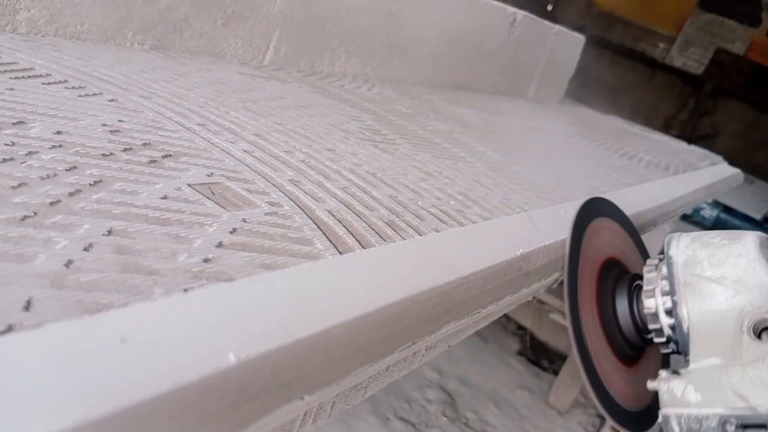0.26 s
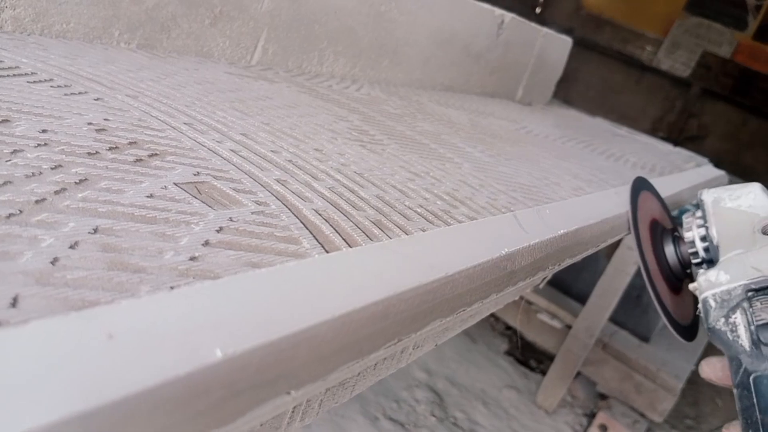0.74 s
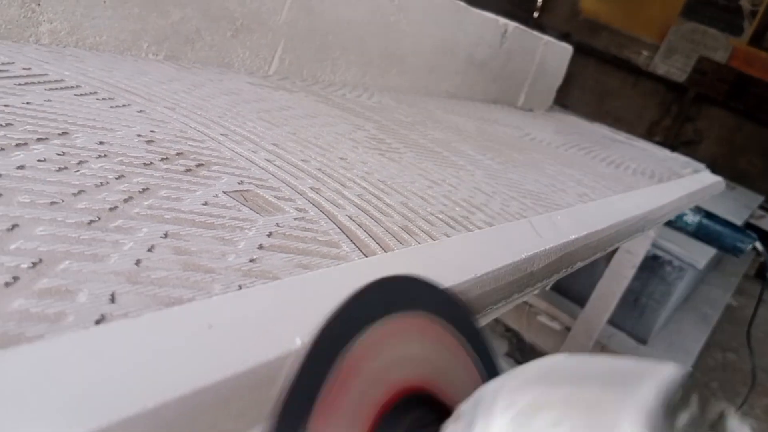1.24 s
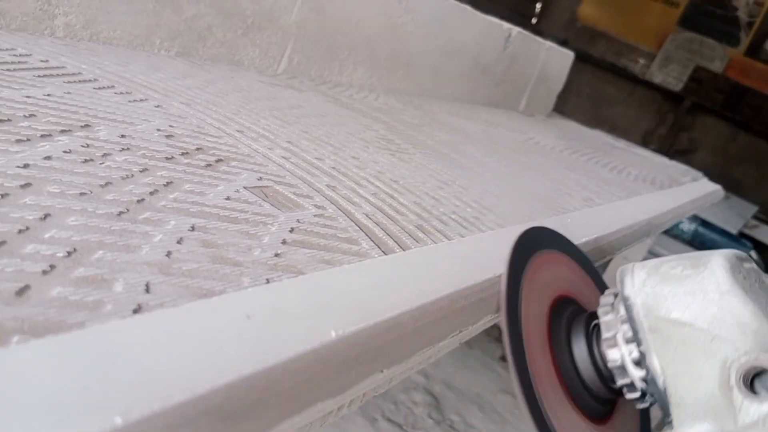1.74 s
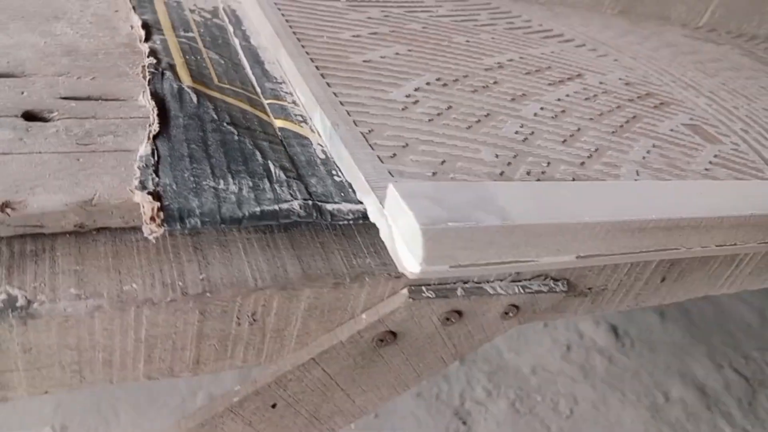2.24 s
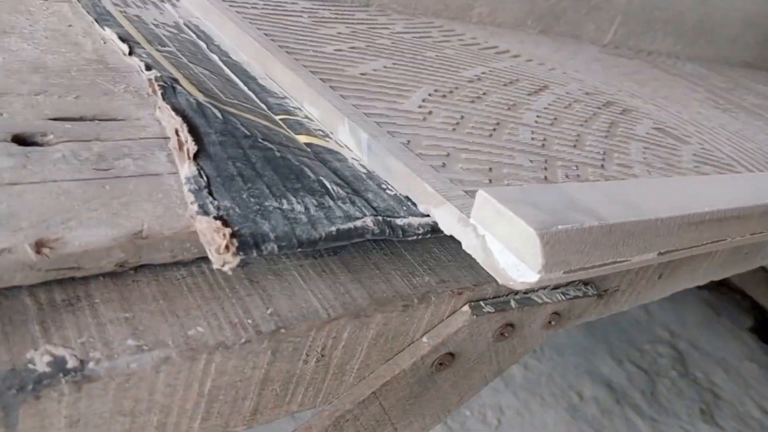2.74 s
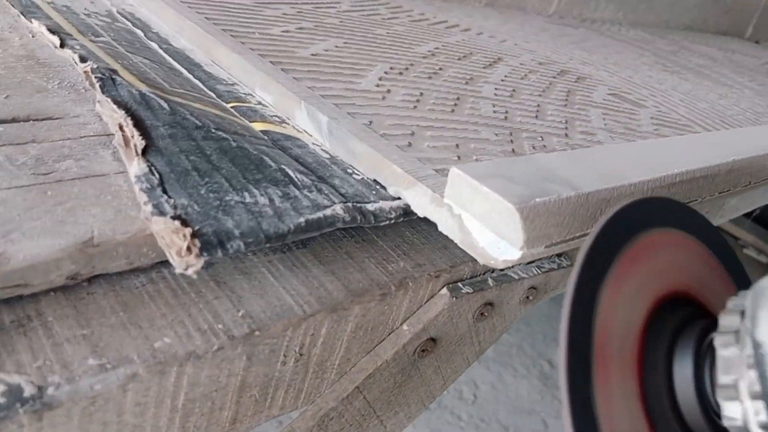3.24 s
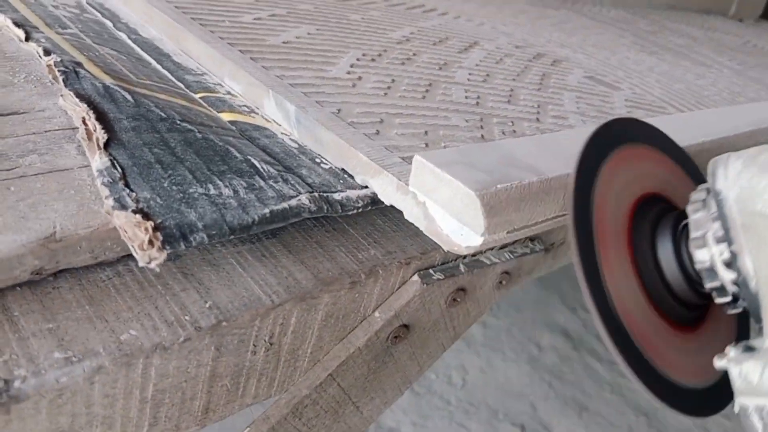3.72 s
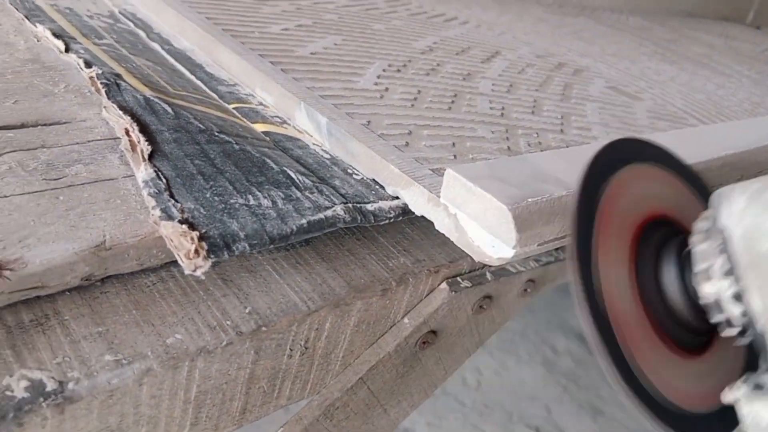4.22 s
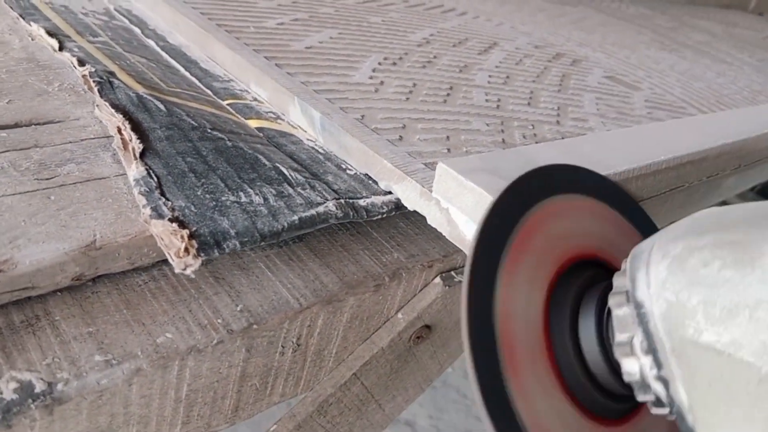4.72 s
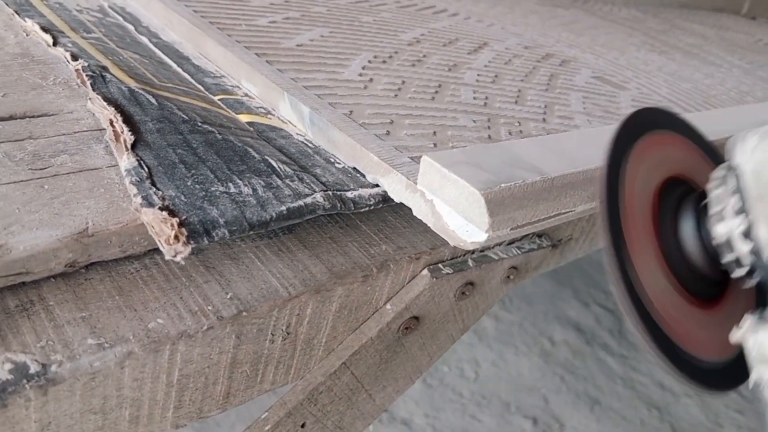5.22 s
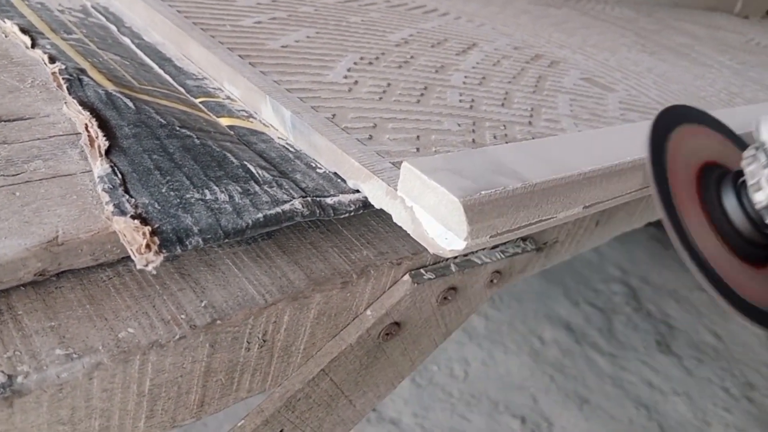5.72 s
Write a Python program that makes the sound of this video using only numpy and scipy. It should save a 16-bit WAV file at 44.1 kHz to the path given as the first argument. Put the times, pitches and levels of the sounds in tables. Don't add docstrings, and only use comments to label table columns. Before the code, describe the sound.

An angle grinder rasps loudly against stone close by, whining and sagging under load, then cuts abruptly to a quieter, duller, more distant pass.

```python
import sys
import numpy as np
from scipy import signal
from scipy.fft import rfft, irfft
from scipy.io import wavfile
from scipy.ndimage import uniform_filter1d, map_coordinates

SR = 44100
rng = np.random.default_rng(int(sys.argv[2]) if len(sys.argv) > 2 else 0)


def file_out(sig):
    cols = np.atleast_2d(sig).T
    lim = np.clip(cols, -1, 1)
    pcm = np.round(lim * 32767).astype(np.int16)
    wavfile.write(sys.argv[1], SR, pcm)


def magnitude_from_level(level_db):
    exponent = np.asarray(level_db, float) / 20
    return 10 ** exponent


N = 262836

GEAR = 3.555
SONG = 26
STEPS = 1024

# (close view ends [s], far view starts [s])
CUT = (2.1318, 2.1378)
CLOSE_END, FAR_START = CUT
# (time [s], disc speed [turns/s], pressure on the stone [dB])
DISC = [
    [(0.0, 132.5, 8), (0.42, 122.8, 10), (0.56, 121.5, 10.5), (0.8, 127.5, 5), (1.25, 131.4, 5),
     (1.47, 134.3, 7), (2.14, 123.5, 7.5)],
    [(2.14, 151.9, 3), (3.3, 152.9, -18), (3.6, 152.4, 5.5), (3.97, 148.6, 3), (4.1, 148.4, 6),
     (4.38, 142.6, 10), (4.66, 144.4, 5), (5.0, 141.7, 7.5), (5.31, 140.8, 2), (5.44, 143.1, 6.5),
     (5.83, 137.1, 8)],
]
REGION_EDGES = [700, 2600, 4500, 5800, 9300, 15500]
# (frequency [Hz], level per Hz [dB])
COLOUR = [
    [(60, -74), (150, -54), (300, -11), (550, -13.5), (900, -4), (2300, -6.5), (2900, -1.5), (3500, 4),
     (4300, -2.5), (5600, -5.5), (7200, 6.5), (8600, 5.5), (11000, 0), (15500, -2.5)],
    [(60, -48), (150, -84), (260, -12), (450, -11), (900, -0.5), (1400, -1), (2500, -2.5), (3800, -2),
     (4400, -6.5), (5600, -11.5), (7700, -4.5), (8800, -5.5), (11000, -21), (15500, -23.5)],
]
# (frequency [Hz], width [Hz], depth [dB])
HOLLOWS = [
    (4842, 197, -20),
    (9330, 110, -9),
    (11680, 410, -3),
    (13780, 450, -8),
]
# (multiple of disc speed [1], level over the grit [dB])
RIDGES = [(1, -20), (9, -18.5), (15, -12.5), (22, -12.5), (30, -6.5), (45, -4), (75, -7.5), (120, -1)]
# (multiple of motor speed [1], side step [disc turns], level over the grit [dB])
WHINE = [(2, -1, -6), (2, 0, -8), (3, 0, -9), (4, 0, -10), (5, 0, -8), (6, 0, -4), (7, 0, -7), (8, 0, -6),
         (10, 0, -5), (11, 0, -4), (12, 0, -8), (1, 1, -11), (2, 1, -11), (1, -1, -9)]
# (frequency [Hz], level per Hz [dB])
WIND_COLOUR = [(25, -40), (60, -15), (125, -0.5), (250, -10.5), (500, -25.5), (1200, -30.5), (3000, -59)]
# (time [s], peak [dB])
POPS = [(0.151, -26), (0.255, -9), (0.323, -31), (0.971, -10), (1.023, -3), (1.047, 6), (1.051, 3.5),
        (1.065, -3), (1.083, 13), (1.096, 0), (1.105, 1), (1.121, -10), (1.156, -3.5), (1.662, -7.5),
        (1.784, -9), (1.81, -7), (1.895, -4), (1.972, -4.5), (2.039, -14), (2.059, -18), (2.131, 4.5),
        (2.546, -19), (4.273, -18), (4.314, -8.5), (5.163, -14), (5.196, -13), (5.617, -12), (5.684, -10),
        (5.752, -5), (5.83, -6)]
# (start [s], end [s], multiple of disc speed [1], level [dB])
TONES = [(0.0, 0.39, 4, -38), (0.0, 0.39, 5, -36), (0.09, 0.42, 19, -33), (0.55, 0.9, 16, -33),
         (2.3, 3.6, 6.11, -46), (0.5, 0.76, 28, -29), (0.5, 0.68, 2.555, -39), (5.32, 5.5, 10, -43),
         (0.54, 0.78, 29, -30), (0.92, 1.3, 55, -29), (1.4, 1.72, 11, -33), (1.15, 1.5, 2.555, -40),
         (5.23, 5.31, 25, -39), (1.16, 1.88, 17, -33), (1.34, 1.73, 4, -39), (1.42, 1.81, 28.44, -32),
         (1.52, 2.1, 57, -30), (1.63, 2.09, 86, -32), (1.71, 2.12, 76, -35), (1.75, 2.12, 60, -29),
         (1.83, 2.12, 16, -33), (3.56, 5.5, 1, -54.5), (3.65, 4.03, 6.11, -43), (3.92, 4.45, 10, -41),
         (4.33, 4.47, 13, -42), (4.58, 4.85, 10, -43), (4.88, 5.16, 13, -40), (5.54, 5.89, 71, -45),
         (5.51, 5.91, 57, -42), (5.53, 5.86, 55, -42)]
# (time [s], level [dB])
REACH = [
    [(0.0, -18.5), (0.2, -19), (0.4, -19), (0.75, -20.5), (0.9, -17.5), (1.3, -20), (1.65, -19.5),
     (2.12, -21.5)],
    [(2.15, -31), (3.0, -29), (3.5, -29.5), (4.23, -27.5), (4.35, -33), (4.75, -33.5), (5.38, -32.5),
     (5.7, -32.5), (5.96, -39.5)],
]
# (start [s], peak [s], end [s], swing [dB])
SWINGS = [(-0.3, 0.363, 0.53, 4), (0.45, 0.62, 0.84, 7), (0.736, 0.865, 1.23, 7), (0.92, 1.186, 1.3, 5.5),
          (1.557, 1.843, 2.95, 7), (3.403, 3.755, 4.18, 4), (4.12, 4.318, 5, 6), (4.714, 4.94, 5.16, 8.5),
          (4.984, 5.217, 5.28, 9), (5.404, 5.646, 6.03, 9.5)]
# (ring [dB], grit [dB], fizz [dB])
AWAY = [(-4.5, -4, -6), (-6, -3.5, -6.5)]
SWING_SHARE = (-0.28, 0.24, 0.94, 1.18)
# (start [s], end [s], level [dB], lift of upper ridges [dB])
STROKES = [(0.0, 0.208, -17, -16), (0.216, 0.53, -21, -4), (1.125, 1.423, -26.5, -8),
           (1.43, 1.72, -21.5, -4.5), (1.732, 1.87, -23.5, 8), (1.9, 2.143, -25.5, 8),
           (3.9, 4.24, -44, -8.5), (4.27, 4.52, -49, 6), (4.552, 4.82, -42, -6), (5.16, 5.3, -45.5, 2.5),
           (5.309, 5.7, -44.5, .3)]
NEIGHBOURS = (22, 24, 25, SONG, 27, 28, 30, 31, 32, 33)
NEIGHBOUR_DB = (-11, -14, -14, -.3, -8, -13, -14, -13, -14, -16)
# (start [s], end [s], level [dB])
HUM = [(0.13, 1.1, -39), (1.25, 1.48, -39.5), (1.72, 2.12, -38), (2.38, 3.02, -47), (3.03, 3.7, -41.5),
       (3.88, 4.15, -42), (4.5, 4.85, -52), (5.26, 5.46, -47), (5.65, 5.85, -53)]
# (start [s], end [s], level [dB])
OVERTONE = [(0.3, 0.81, -35), (1.05, 1.48, -34), (4.12, 4.3, -43), (4.33, 4.95, -45), (4.96, 5.3, -48),
            (5.33, 5.69, -40.5)]
# (start [s], length [s], level [dB])
GUSTS = [(0.93, 0.15, -31.5), (1.05, .026, -20), (1.088, 0.023, -13), (1.146, 0.019, -22.5),
         (1.781, 0.067, -21), (1.888, 0.017, -29.5), (1.957, .02, -27), (2.553, 0.014, -38),
         (2.77, 0.014, -50), (4.272, 0.077, -33.5), (4.385, .015, -43.5), (4.944, .14, -42.5),
         (5.163, .015, -35), (5.184, 0.032, -31), (5.563, 0.074, -39.5), (5.664, 0.16, -26.5)]
# (time [s], lowest frequency [Hz])
SIDE_PATCHES = [(0.051, 13700), (0.375, 4130), (0.654, 5640), (1.537, 5600), (1.581, 7490), (2.282, 4180),
                (2.282, 10980), (2.63, 8910), (2.63, 9800), (2.63, 13000), (3.187, 6200), (3.187, 11670),
                (3.698, 5120), (3.86, 12360), (4.255, 13050), (4.672, 13050), (4.859, 12360)]


def evened(x):
    return x / np.sqrt(np.mean(abs(x) ** 2) + 1e-20)


def read(points, hz):
    f, value = np.transpose(points)
    return np.interp(np.log(hz + 1), np.log(f + 1), value)


def curves(views, t):
    close, far = (np.transpose(rows) for rows in views)
    return [np.where(t < CLOSE_END, np.interp(t, close[0], a), np.interp(t, far[0], b))
            for a, b in zip(close[1:], far[1:])]


def drift(shape, along, across=1):
    x = uniform_filter1d(rng.standard_normal(shape), max(round(across), 1), -1)
    for _ in range(2):
        x = uniform_filter1d(x, round(along), 0)
    return evened(x)


def wind_level(t):
    far = t > CLOSE_END
    stage = far.astype(int) + (far & (curves(DISC, t)[1] > 0))
    draught_db = np.array((-36.5, -67.5, -57))[stage] + np.array((2, 8, 3.5))[stage] * drift(N, 2500)
    gust_db = np.full(N, -120.)
    for start, length, db in GUSTS:
        sag = 9 * ((t - start) / length).clip(0, 1)
        rise = 1000 * (start - t).clip(0)
        fall = 320 * (t - start - length).clip(0)
        gust_db = np.maximum(gust_db, db - sag - rise - fall)
    return draught_db, gust_db


def wind():
    t = np.arange(N) / SR
    hz = np.fft.rfftfreq(N, 1 / SR)
    rumble = evened(irfft(rfft(rng.standard_normal(N)) * magnitude_from_level(read(WIND_COLOUR, hz)), N))
    draught_db, gust_db = wind_level(t)
    rumble *= magnitude_from_level(np.maximum(draught_db, gust_db) - 4 + 2.5 * drift(N, 260))

    beat = np.cumsum(magnitude_from_level(6 * 0.4 * drift(N, 200))) * 145 / SR
    shed = np.diff(np.floor(beat), prepend=0) * (gust_db > draught_db + 3)
    large = rng.random(N) < 0.45
    chance = np.array([shed * ~large * magnitude_from_level(1.5), shed * large])
    eddy_db = gust_db + 13 + 4 * rng.standard_normal((2, N)).clip(-2, 1)
    hits = chance * magnitude_from_level(eddy_db) * rng.choice([-1, 1], (2, N))

    s, db = np.transpose(POPS)
    sign, size = rng.standard_normal((len(s), 2)).T
    is_large = (size + db / 4 > -1.5).astype(int)
    hits[is_large, np.round(s * SR).astype(int)] = magnitude_from_level(db - 8.0) * np.sign(sign)

    u = t[:2000]
    push = (1 - np.exp(-u / .00015)) * np.exp(-u / [[.00028], [.0007]])
    low_cut = signal.butter(4, 105, "hp", fs=SR, output="sos")
    pop = signal.sosfilt(low_cut, push)
    pop /= pop.max(1)[:, None]
    close, far = (signal.oaconvolve(hits * view, pop, axes=1).sum(0)[10:N + 10]
                  for view in (t < CLOSE_END, t > CLOSE_END))
    return rumble + close * (t < FAR_START) + far


def nearest_order(order):
    allowed = (np.arange(-2, 120)[:, None] + GEAR * np.array([0, 1, 2, 8])).ravel()
    return allowed[np.argmin(abs(allowed - order))]


def singing_orders(turns):
    out = np.zeros(N)
    waver_db = 2.5 * drift((N // 256 + 2, 8), 9)
    hum = [(start, end, GEAR, db) for start, end, db in HUM]
    hum += [(start, end, 2 * GEAR, db) for start, end, db in OVERTONE]
    song = [(start, end, order, db + over + lift * (order > SONG + 2))
            for start, end, db, lift in STROKES for order, over in zip(NEIGHBOURS, NEIGHBOUR_DB)]
    for k, (start, end, order, db) in enumerate(TONES + hum + song):
        span = np.arange(max(round((start - .04) * SR), 0), min(round((end + .04) * SR), N))
        span = span[(span < FAR_START * SR) == (start < CLOSE_END)]
        rise = span / SR - start + 0.045 + (start < .01)
        fall = end + 0.062 - span / SR
        swell = np.clip(np.minimum(rise, fall) / 0.11, 0, 1)
        level = magnitude_from_level(db + np.interp(span / 256, np.arange(len(waver_db)), waver_db[:, k % 8]))
        phase = nearest_order(order) * turns[span] + round(order) ** 2 / np.pi
        out[span] += swell * level * np.sin(2 * np.pi * phase)
    return out


def motor_whine(turns, speed):
    waver_db = 2.5 * drift((N // 512 + 2, len(WHINE)), 10)
    out = np.zeros(N)
    for (order, side, db), wobble in zip(WHINE, waver_db.T):
        level = magnitude_from_level(db + np.interp(np.arange(N) / 512, np.arange(len(wobble)), wobble))
        phase = (round(order) * GEAR + round(side)) * turns + rng.random()
        out += level * np.sin(2 * np.pi * phase)
    return np.sqrt(4 * speed / SR) * out


def scratch_pattern(turns, speed, low_db, high_db):
    wear_turns, worn = 11, 0.8
    count, k = int(turns[-1]) + 2, np.arange(STEPS // 2 + 1)
    at = np.searchsorted(turns, np.arange(count)).clip(0, N - 1)
    ridge_db = read(RIDGES, k) + 2.2 * rng.standard_normal((2, len(k)))
    ridge_db[:, SONG] = -35
    far = (at / SR > CLOSE_END).astype(int)
    db = ridge_db[far] + np.where(k < 35, low_db[at, None], high_db[at, None] + 2.5)
    shape = (count, len(k))
    wearing = (drift(shape, wear_turns) + 1j * drift(shape, wear_turns)) / np.sqrt(2)
    lasting = np.exp(2j * np.pi * rng.random(len(k)))
    lines = magnitude_from_level(db) * (worn * wearing + np.sqrt(1 - worn ** 2) * lasting)
    lines *= (k * speed[at, None] < 16500) * (k > 0)
    height = np.sqrt(4 * speed / SR)
    pattern = irfft(lines).ravel() * STEPS / 2
    return height * map_coordinates(pattern, [turns * STEPS], order=3)


def swing_of(t):
    return sum(db * np.interp(t, (start, peak, end), (0, 1, 0)) * ((peak > CLOSE_END) == (t > CLOSE_END))
               for start, peak, end, db in SWINGS)


def regions(t):
    far = (t > CLOSE_END).astype(int)
    swing = swing_of(t)
    singing = sum(np.interp(t, (start - .04, start, end, end + 0.03), (0, 1, 1, 0))
                  for start, end, *_ in STROKES).clip(0, 1)
    body = curves(REACH, t)[0] + SWING_SHARE[0] * swing
    ring, grit, fizz = np.array(AWAY)[far].T + np.outer(SWING_SHARE[1:], swing)
    return body, ring + 0.04 * singing, grit, fizz


def radiate(x):
    hz, t, z = signal.stft(x, SR, nperseg=512, noverlap=384)
    body, *over = regions(t)
    close_db, far_db = (read(points, hz)[:, None] for points in COLOUR)
    colour_db = np.where(t > CLOSE_END, far_db, close_db)
    colour_db += sum(db / (1 + ((hz - f) / width) ** 2) for f, width, db in HOLLOWS)[:, None]
    shift_db, centres = [], []
    for level, edge in zip([body] + [body + o for o in over], (0, 1, 3, 4)):
        lo, hi = REGION_EDGES[edge:edge + 2]
        inside = (hz > lo) & (hz < hi)
        shift_db.append(level - 10 * np.log10((magnitude_from_level(colour_db[inside]) ** 2).sum(0) / len(hz)))
        centres += [lo * 1.13, hi / 0.98]
    share = np.array([np.interp(hz, centres, np.repeat(row, 2)) for row in np.eye(4)])
    field_db = colour_db + share.T @ shift_db + 1.1 * drift(z.T.shape, 22, 7).T
    touching = np.clip(1.4 + curves(DISC, t)[1] / 10, 0, 1)
    glints = drift(z.T.shape, 35, 4).T * np.clip(hz / 7000, 0, 1)[:, None]
    field_db += 1.8 * touching * glints
    return signal.istft(z * magnitude_from_level(field_db), SR, nperseg=512, noverlap=384)[1][:N]


def grinder():
    t = np.arange(N) / SR
    speed, pressure_db = curves(DISC, t)
    cut = round(CLOSE_END * SR)
    for view in (slice(0, cut), slice(cut + 1, N)):
        speed[view] = uniform_filter1d(speed[view], round(0.09 * SR), mode="nearest")
    turns = np.cumsum(speed * (1 + 0.001198 * drift(N, 1570))) / SR
    wander_db = 3.0
    low_db = pressure_db + wander_db * drift(N, 4000)
    high_db = -2.5 + 0.34 * pressure_db + 0.31 * swing_of(t) + wander_db * drift(N, 5800)
    grit = rng.standard_normal(N) * magnitude_from_level(0.99 * drift(N, 30))
    source = grit + scratch_pattern(turns, speed, low_db, high_db) + motor_whine(turns, speed)
    source /= np.sqrt(uniform_filter1d(source ** 2, 8000))
    return radiate(source) + np.sqrt(2) * magnitude_from_level(-1.0) * singing_orders(turns)


def scene():
    t = np.arange(N) / SR
    gap = np.maximum((CLOSE_END - t) / .0004, (t - FAR_START) / .001)
    return np.tile((grinder() + wind()) * np.clip(gap, .02, 1), (2, 1))


def side_patches(x):
    width_hz, length_s = 1350, .032
    hz, t, z = signal.stft(x, SR, nperseg=512, noverlap=384)
    mask = sum(np.outer((hz > lo) & (hz < lo + width_hz), np.cos(np.pi * ((t - s) / length_s).clip(-.5, .5)))
               for s, lo in SIDE_PATCHES).clip(0, 1)
    power = uniform_filter1d(abs(z) ** 2, size=9, axis=0)
    level = np.sqrt(uniform_filter1d(power, size=9, axis=1).clip(0))
    noise = signal.stft(rng.standard_normal(N), SR, nperseg=512, noverlap=384)[2]
    patches = magnitude_from_level(-3) * mask * level * evened(noise)
    side = signal.istft(patches, SR, nperseg=512, noverlap=384)[1][:N]
    return np.array([x + side, x - side])


def low_pass(x):
    return signal.sosfilt(signal.butter(12, 16860, fs=SR, output="sos"), x)


def record(dry):
    treble_cut = signal.firwin(1501, 15515, window=("kaiser", 7), fs=SR)
    limited = signal.oaconvolve(np.clip(dry, -1.05, 1.05), treble_cut[None], "same")
    mix = np.clip(side_patches(limited[0]), -1, 1)
    return low_pass(mix)


dry = scene()
out = record(dry)
file_out(out)
```